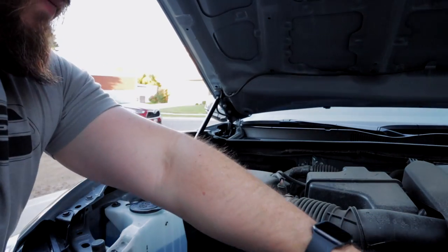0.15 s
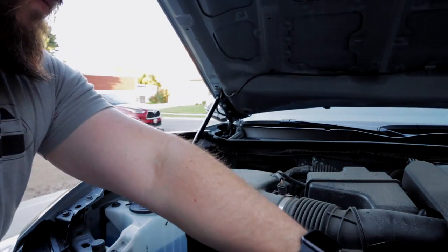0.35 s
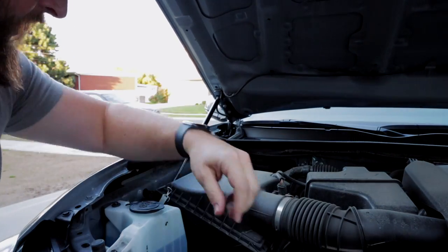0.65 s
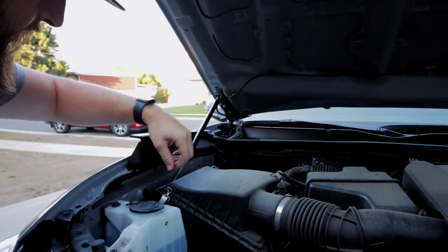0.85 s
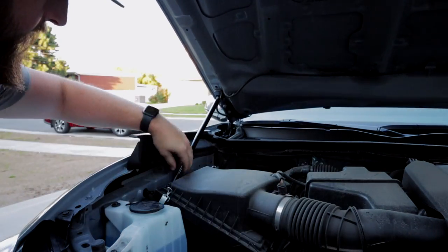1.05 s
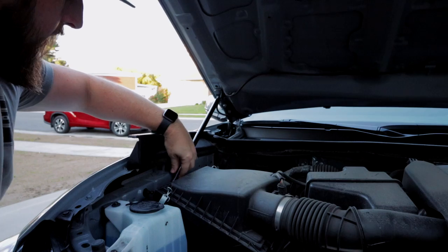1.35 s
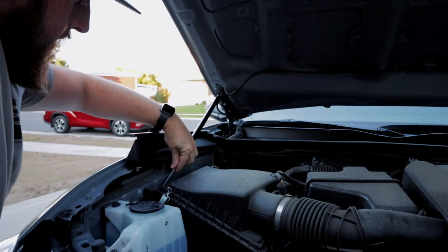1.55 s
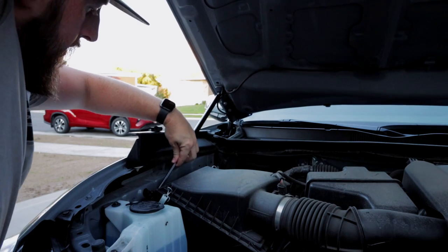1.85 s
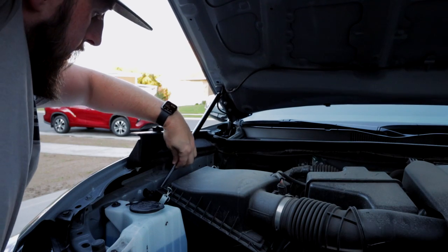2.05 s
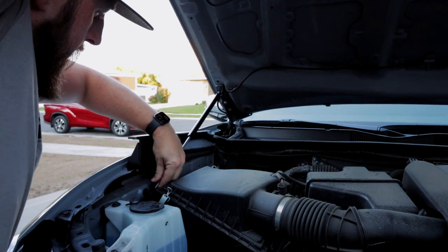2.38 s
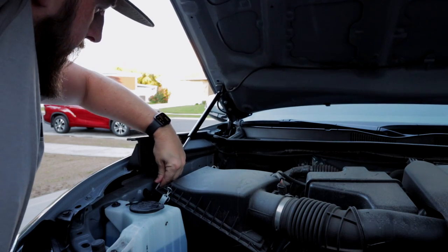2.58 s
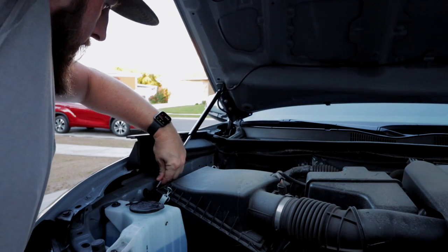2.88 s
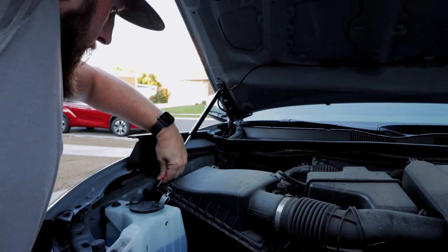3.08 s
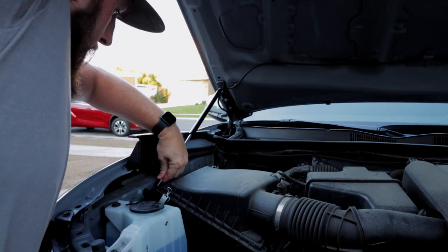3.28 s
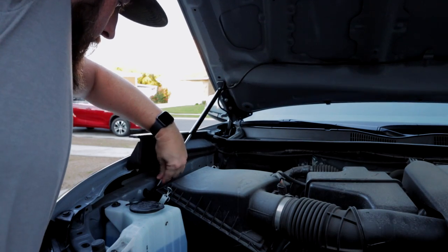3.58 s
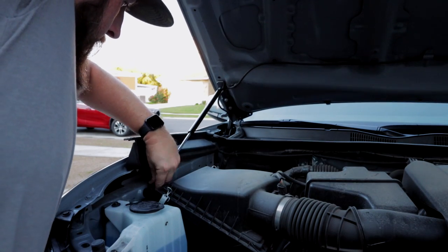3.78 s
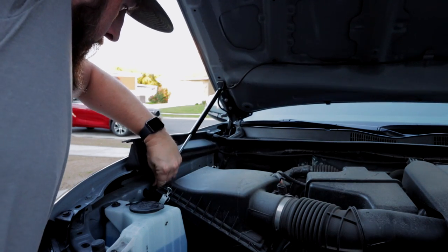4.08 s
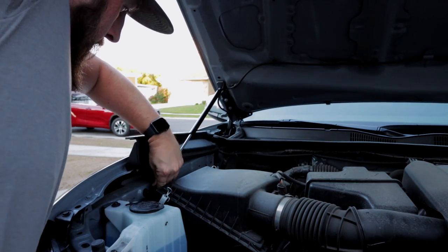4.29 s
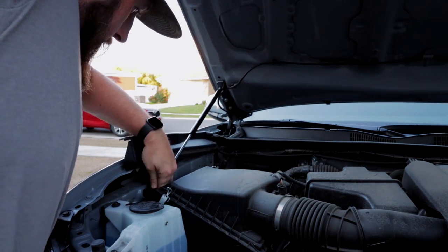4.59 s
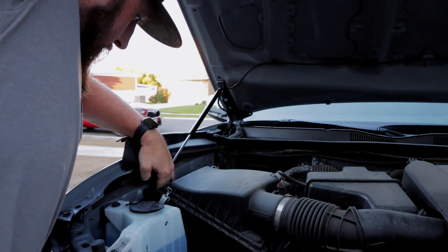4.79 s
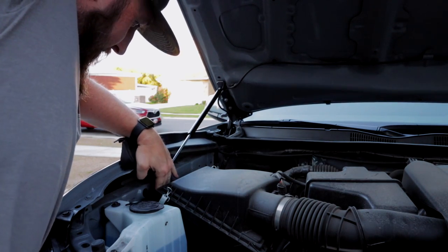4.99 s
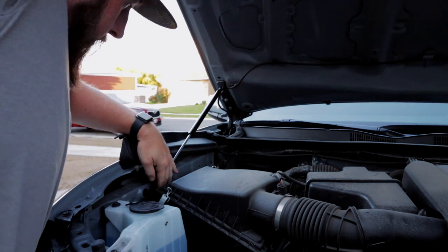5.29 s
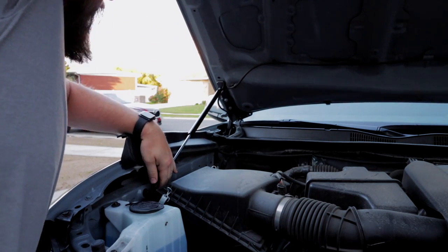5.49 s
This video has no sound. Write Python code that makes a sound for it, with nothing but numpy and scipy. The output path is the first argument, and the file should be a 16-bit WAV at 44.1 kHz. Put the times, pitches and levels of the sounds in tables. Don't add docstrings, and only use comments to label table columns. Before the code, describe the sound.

Irregular metallic knocks, plastic-on-steel raps and short rubbing strokes, heard close in an engine bay with a short boxy echo and faint hood booms. Far road hum stays low beneath. After a run of quieter scraping, the socket seats with a hard, ringing snap that clips the microphone, followed by light hand friction and tiny ticks.

```python
import sys
import numpy as np
from scipy import signal
from scipy.fft import rfft, irfft, next_fast_len
from scipy.io import wavfile
from scipy.ndimage import uniform_filter1d, map_coordinates

SR = 44100
rng = np.random.default_rng(int(sys.argv[2]) if len(sys.argv) > 2 else 0)


def log_audio(samples):
    frames = np.atleast_2d(samples).T
    limited = np.clip(frames, -1, 1)
    pcm = np.round(limited * 32767).astype(np.int16)
    wavfile.write(sys.argv[1], SR, pcm)


def decibels_to_gain(level_db):
    exponent = np.asarray(level_db, float) / 20
    return 10 ** exponent


N = 248724

# (time [s], bracket level [dB], panel level [dB re bracket], hardness [dB], panel tilt [dB/octave])
KNOCKS = [(0.025, -35, 1, -8, 8.5), (0.308, -20, 5, -9.5, 3.5), (0.322, -25, -3, -0.5, 5),
          (1.146, -39, 4.5, -5, -4), (1.158, -36, -13, -2.5, 8), (1.424, -14.5, 7.5, -13, 10),
          (1.453, -15.5, 5, -23, 7), (1.475, -22, 10, -16, 5), (1.536, -43, 15, -5.5, 10),
          (2.253, -32, 13, -28, -1.5), (2.317, -37.5, 12, -9.5, 1.5), (2.342, -45, 21, -34, -5),
          (2.385, -52, 1, -2, 21), (2.565, -17, -5, -10.5, -3), (3.357, -31, 2, -18, -23.5),
          (3.48, -38.5, 10, -7.5, -2), (3.693, -47.5, 11.5, 4, 5), (4.799, -42.5, 4.5, -6, -9),
          (4.85, -15, -8, -8.5, 15), (4.897, -7.5, -5.5, -3, 1), (4.902, -5, -5.5, -4.5, -6),
          (4.932, -19, 3.5, -7, 1), (5.048, -45.5, -3, 2, 11)]
# (time [s], bracket level [dB], panel level [dB re bracket], hardness [dB], stroke length [s])
SCRAPES = [(0.153, -44, 4.5, -18, 0.024), (0.183, -37, 1.5, -9.5, 0.055), (0.344, -35, -15, -4, 0.013),
           (0.452, -42, -22, -7, 0.03), (2.175, -36.5, 5, -13.5, 0.015), (2.206, -38.5, 5, -27, 0.017),
           (2.262, -40.5, 23, -27, 0.014), (3.356, -41.5, 12, -18, 0.011), (3.463, -35.5, 13, -9.5, 0.032),
           (3.534, -63, 15, -14, 0.035), (3.742, -59, 25, -14, 0.055), (3.811, -30, 4, -14, 0.069),
           (3.847, -24, -4, -35, 0.019), (3.906, -49.5, 16.5, -21, 0.0081), (4.018, -39, -20, -24, 0.014),
           (4.126, -55.5, 16.5, -22, 0.014), (4.467, -28.5, 0, -7, 0.025), (4.775, -52, 9, -5, 0.044),
           (4.834, -13, -6, -11, 0.028), (4.846, -26.5, -23, -6.5, 0.067), (5.161, -40, -22, -7, 0.0074)]
# (time [s], bracket level [dB], panel level [dB re bracket], rod level [dB re bracket], length [s])
RAPS = [(1.451, -28.5, -12, -5, 0.0064), (1.948, -20.5, -4, -15.5, .008), (1.955, -31.5, 4.5, -10, 0.021),
        (2.569, -13.5, -12.5, -9, 0.012), (3.36, -37, 0, -7, .01), (3.797, -29, -6, -11.5, 0.028),
        (3.982, -24.5, -9, -16, 0.03)]
# (time [s], rod level [dB], spring clip level [dB re rod])
TICKS = [(.312, -44.5, 16), (1.222, -45.5, 1), (1.433, -49, 6.5), (1.453, -32.5, -7.5), (1.797, -58, 7),
         (1.827, -66, -3), (2.254, -42, 2), (2.32, -53.5, 7), (4.021, -62, 12), (5.053, -58, -2),
         (2.568, -69, -14), (3.563, -61, 4), (4.478, -67, -4), (4.544, -56, 4.5), (4.847, -52, 8),
         (4.899, -28, 21.5), (5.33, -61, 11), (5.36, -59, 12), (5.449, -64, 17)]

# (frequency [Hz], level [dB], t60 [s])
PANEL_MODES = [(197.8, -7, 0.2), (252.9, -0.5, 0.27), (317.5, -11, .2), (333.7, 2, 0.16), (392, -5.5, 0.15),
               (484.5, -8.5, 0.16), (578.4, -3, 0.13), (597.6, -12, 0.22)]
# (frequency [Hz], level [dB], t60 [s])
BRACKET_MODES = [(716.7, 7.5, 0.042), (839, -0.5, 0.11), (892.4, 8, 0.085), (1016.4, 9, 0.042),
                 (1085, 6.5, 0.056), (1242, -2, 0.083), (1335, -12.5, 0.042), (1370, 3, 0.083),
                 (1573, -5.5, 0.087), (1712, -0.5, 0.016), (1830, -37, 0.11)]
# (frequency [Hz], level [dB], t60 [s])
ROD_MODES = [(2370, -2, .11), (2495, -2, .12), (2770, -6, .07), (3280, -6, .08), (3440, -5, .07),
             (3800, -10, .08)]
# (frequency [Hz], level [dB], t60 [s])
CLIP_MODES = [(4680, -5, .05), (5150, -6, .04), (5500, -7, .04), (5980, 0, .045), (6150, -7, .035),
              (13900, -4, .014), (14300, -3, .014), (15200, -4, .014)]
# (low edge [Hz], high edge [Hz], level [dB], t60 [s])
DENSE_MODES = [
    (233, 806, -4, 0.19),
    (626, 1940, 6, 0.087),
    (1820, 3960, 8, 0.071),
    (3860, 12200, -2.5, 0.064),
]
# (frequency [Hz], level [dB], t60 [s])
SEAT_MODES = [(237.4, -2.5, 0.28), (315, 0.5, 0.2), (400.4, -16.5, 0.45), (848, -5, 0.053), (1100, -7, .07),
              (1231, 9.5, 0.084), (1322, 6.5, 0.096), (1370, -9, 0.071), (1600, -10, 0.042),
              (2368, 6, 0.053), (2460, -11, 0.08), (5980, -23, 0.02), (14600, -9, .025)]

# (frequency [Hz], t60 [s])
BAY_DECAY = [(200, 0.59), (1000, 0.31), (3000, 0.27), (6000, 0.15), (15000, 0.11)]
# (time [s], level [dB])
HOOD_BOOMS = [(0.339, -45.5), (1.168, -52), (1.468, -36.5), (1.968, -61), (2.278, -43), (2.577, -49),
              (3.373, -49), (4.909, -52)]
# (time [s], hold [s], skin level [dB], sleeve level [dB re skin])
SLIDES = [(0.278, 0.089, -66, 2), (1.094, .06, -60, -9), (1.159, 0.021, -56, 6), (1.37, .03, -57, -4),
          (1.52, 0.21, -69.5, 9), (1.8, 0.054, -57.5, -7), (1.91, 0.21, -65, -3), (2.195, 0.032, -56, -10),
          (2.235, 0.025, -59, 5), (3.797, 0.033, -55.5, -1), (4.55, 0.013, -56, -5), (4.782, .04, -65.5, 6),
          (4.947, 0.056, -56.5, 7), (5.053, 0.14, -51.5, 0.5), (5.255, 0.15, -50, -4.5),
          (5.454, 0.15, -48, -9)]
# (frequency [Hz], level [dB])
SKIN_SPECTRUM = [(3500, -23), (5500, -6.5), (7000, -0.5), (8200, 1.5), (9400, -2), (10600, -9),
                 (12300, 7.5), (14300, 1.5), (15800, -13.5)]
# (frequency [Hz], level [dB])
SLEEVE_SPECTRUM = [(1500, 8.5), (2500, -4.5), (4000, 4), (6000, 1), (8000, -43)]
# (time [s], frequency [Hz], level [dB])
SQUEAK_PATH = [(3.755, 5700, -69), (3.765, 5957, -62), (3.777, 5992, -60), (3.789, 5750, -62),
               (3.84, 5300, -74)]
# (time [s], rumble level [dB])
TRAFFIC_LEVEL = [(0, -53), (.96, -56), (1.65, -53), (2.1, -54.5), (3.03, -53.5), (3.31, -51), (4.2, -54.5),
                 (4.84, -49), (5.64, -51.5)]
# (frequency [Hz], level [dB])
RUMBLE_SPECTRUM = [(12, -53), (25, -9), (40, -9), (60, -3.5), (90, -0.5), (118, 2), (160, -2.5), (250, -24),
                   (400, -72)]
# (frequency [Hz], level [dB])
ROAD_SPECTRUM = [(80, -33), (150, -11.5), (250, -2.5), (400, -6.5), (650, -4.5), (960, -4.5), (1400, -13),
                 (2200, -21), (4000, -26.5), (8400, -32), (10500, -30), (13000, -21), (16000, -33)]
# (frequency [Hz], gain [dB])
MIC_RESPONSE = [(5000, -0.5), (8500, 1), (10500, -2.5), (12000, -9), (14500, -10), (15650, 2), (15900, -59)]

KNOCK_S, TICK_S = 0.006, 0.0042
CLIP_PER_HARD, CLIP_DB = 1.48, -7.5
TICK_BRACKET_DB, TICK_PANEL_DB = -6, -12
TICK_DAMP = 0.72
PUSH_TILT_DB = 0
RAP_CLIP_DB, RAP_TILT_DB = -47, 1
SEAT_S, SEAT_DB, SEAT_RISE_S = 4.901, -12, 0.0054
SLIDE_RISE_S, SLIDE_FALL_S = 0.044, 0.034
GRIP_DB = -73
ROAD_DB, ROAD_FOLLOWS = -52.5, 0.08


def ring(modes, crowd, chatter, tilt_db, damp):
    t = np.arange(SR // 4) / SR
    hz, db, t60 = np.transpose(modes)[:, :, None]
    low_hz, high_hz, crowd_db, crowd_t60 = crowd
    t60, crowd_t60 = damp * t60, damp * crowd_t60
    grow = 1 - np.exp(-(t * low_hz) ** 2)

    strength_db = db + 3.9 * rng.standard_normal(hz.shape) + tilt_db * np.log2(hz / low_hz)
    level = decibels_to_gain(strength_db - 60 * t / t60)
    knots = rng.standard_normal((len(hz), 40))
    drift = np.array([np.interp(t * 110, np.arange(len(k)), k) for k in knots])
    stored = signal.fftconvolve(chatter[None] ** 2, (grow * level) ** 2, axes=1)[:, :len(t)]
    phase = 2 * np.pi * hz * t + 1.45 * np.sqrt(hz / 900) * drift
    lines = np.sum(np.sqrt(np.abs(stored)) * np.sin(phase), axis=0)

    f = np.fft.rfftfreq(len(t), 1 / SR) + 1
    band = decibels_to_gain(tilt_db * np.log2(f / low_hz)) / (1 + (low_hz / f) ** 6) / (1 + (f / high_hz) ** 6)
    noise = rfft(rng.standard_normal(len(t)))
    dense = irfft(noise * band, len(t)) / np.sqrt(np.mean(band ** 2))
    tail = decibels_to_gain(crowd_db - 60 * t / crowd_t60) + decibels_to_gain(crowd_db - 21 - 24 * t / crowd_t60)
    energy = signal.fftconvolve(chatter ** 2, (grow * tail) ** 2)[:len(t)]
    return lines + dense * np.sqrt(np.abs(energy))


def contacts(rows, rise, spike_db, gain_db, damp=1):
    out = np.zeros(N + SR)
    parts = PANEL_MODES, BRACKET_MODES, ROD_MODES, CLIP_MODES
    for s, db, panel_db, rod_db, clip_db, panel_tilt_db, bracket_tilt_db, length in rows:
        u = np.arange(SR // 8) / SR / max(length, 1e-3)
        taps = decibels_to_gain(9.7 * np.repeat(rng.standard_normal(len(u) // 60 + 1), 60)[:len(u)])
        chatter = (1 - np.exp(-u / rise)) * np.exp(-u ** 2) * taps
        chatter[round(rise * length * SR)] += decibels_to_gain(spike_db)

        rod_tilt_db = min(0.64 * rod_db + 3.5, 3)
        clip_tilt_db = np.clip(0.5 * (clip_db - rod_db) - 7.0, -13, 3)
        tilts = panel_tilt_db, bracket_tilt_db, rod_tilt_db, clip_tilt_db
        levels = panel_db, 0, rod_db, clip_db
        start = round((s + 0.0015) * SR)
        for modes, crowd, tilt_db, rel_db in zip(parts, DENSE_MODES, tilts, levels):
            sound = ring(modes, crowd, chatter, tilt_db, damp)
            peak = np.sqrt(uniform_filter1d(sound ** 2, size=300).max())
            out[start:][:len(sound)] += decibels_to_gain(db + rel_db + gain_db) * sound / peak
    return out[:N]


def gripped(s, db, panel_db, hard_db, tilt_db, length):
    return s, db, panel_db, hard_db, CLIP_DB + CLIP_PER_HARD * hard_db, tilt_db, 0, length


def knocks():
    rows = [gripped(*row, KNOCK_S) for row in KNOCKS]
    return contacts(rows, rise=0.039, spike_db=19, gain_db=-6.0)


def ticks():
    rows = []
    for s, rod_db, clip_db in TICKS:
        bracket_db = rod_db + TICK_BRACKET_DB
        rows.append((s, bracket_db, TICK_PANEL_DB, -TICK_BRACKET_DB, clip_db - TICK_BRACKET_DB, 0, 0, TICK_S))
    return contacts(rows, rise=0.12, spike_db=20, gain_db=-7.0, damp=TICK_DAMP)


def scrapes():
    rows = [gripped(*row, PUSH_TILT_DB, length) for *row, length in SCRAPES]
    return contacts(rows, rise=0.36, spike_db=-14, gain_db=-8.0)


def raps():
    rows = [(*row, RAP_CLIP_DB, PUSH_TILT_DB, RAP_TILT_DB, length) for *row, length in RAPS]
    return contacts(rows, rise=0.079, spike_db=13, gain_db=-8)


def seat():
    t = np.arange(SR // 4) / SR
    hz, db, t60 = np.transpose(SEAT_MODES)[:, :, None]
    phase = 2 * np.pi * (hz * t + rng.random(hz.shape))
    tones = decibels_to_gain(SEAT_DB + db - 60 * t / t60) * np.sin(phase)
    out = np.zeros(N)
    out[round(SEAT_S * SR):][:len(t)] = (1 - np.exp(-(t / SEAT_RISE_S) ** 2)) * tones.sum(axis=0)
    return out


def bay(x):
    hz, t, z = signal.stft(rng.standard_normal(SR // 2), SR, nperseg=256)
    decay = decibels_to_gain(-60 * t / along(BAY_DECAY, hz)[:, None])
    tail = signal.istft(z * decay, SR, nperseg=256)[1]
    return signal.fftconvolve(x, tail / np.linalg.norm(tail))[:N]


def hood():
    out = np.zeros(N + SR)
    t = np.arange(SR // 2) / SR
    boom = np.sin(2 * np.pi * 112 * t) + 0.52 * np.sin(2 * np.pi * 124 * t)
    swell = 1 - np.exp(-t / 0.013)
    for s, db in HOOD_BOOMS:
        out[round(s * SR):][:len(t)] += decibels_to_gain(db - 60 * t / 0.61) * swell * boom
    return out[:N]


def rustle():
    t = np.arange(N) / SR
    s, hold, skin_db, sleeve_db = np.transpose(SLIDES)[:, :, None]
    swell = np.clip((t - s) / SLIDE_RISE_S + 1, 0, 1) ** 2
    shape = swell * np.exp(-np.maximum(t - s - hold, 0) / SLIDE_FALL_S)
    slips = decibels_to_gain(1.5 * wobble(40) + 2.4 * wobble(160) - 4.0)
    skin_level = decibels_to_gain(GRIP_DB) + np.sum(decibels_to_gain(skin_db) * shape, axis=0)
    sleeve_level = decibels_to_gain(GRIP_DB) + np.sum(decibels_to_gain(skin_db + sleeve_db) * shape, axis=0)
    skin = skin_level * rush(SKIN_SPECTRUM, patchy_db=2.0)
    sleeve = sleeve_level * rush(SLEEVE_SPECTRUM, patchy_db=-1.5)
    return slips * (skin + sleeve)


def squeak():
    hz, db = curves(SQUEAK_PATH)
    t = np.arange(N) / SR
    start, end = SQUEAK_PATH[0][0], SQUEAK_PATH[-1][0]
    gate = np.clip(np.minimum(t - start, end - t) / 0.0083, 0, 1)
    level = decibels_to_gain(db + 2 + 3.5 * wobble(150))
    phase = 2 * np.pi * np.cumsum(hz * (1 + 0.0065 * wobble(200))) / SR
    return gate * level * np.sin(phase)


def traffic():
    near_db, = curves(TRAFFIC_LEVEL)
    rumble = decibels_to_gain(near_db - 3.3 + 0.4 * wobble(6)) * rush(RUMBLE_SPECTRUM, patchy_db=0.4)
    sway_db = 0.6 * wobble(8)
    hiss_db = ROAD_DB + ROAD_FOLLOWS * (near_db - near_db.mean()) + sway_db
    return rumble + decibels_to_gain(hiss_db) * rush(ROAD_SPECTRUM, patchy_db=1.6)


def rush(spectrum, patchy_db):
    z = signal.stft(rng.standard_normal(N + 512), nperseg=256)[2]
    field = uniform_filter1d(rng.standard_normal(z.shape), size=6, axis=0)
    field = uniform_filter1d(field, size=8, axis=1)
    white = signal.istft(z * decibels_to_gain(patchy_db * unit(field)), nperseg=256)[1][:N]
    return unit(coloured(white, spectrum))


def coloured(x, spectrum):
    size = next_fast_len(N + 4096)
    gain = decibels_to_gain(along(spectrum, np.fft.rfftfreq(size, 1 / SR)))
    return irfft(rfft(x, size) * gain, size)[..., :N]


def along(points, hz):
    f, v = np.transpose(points)
    return np.interp(np.log(hz + 1), np.log(f + 1), v)


def curves(rows):
    s, *cols = np.transpose(rows)
    return [np.interp(np.arange(N) / SR, s, c) for c in cols]


def wobble(rate):
    knots = rng.standard_normal(int(N * rate / SR) + 4)
    return map_coordinates(knots, [np.arange(N) * rate / SR])


def unit(x):
    return x / np.sqrt(np.mean(x ** 2) + 1e-20)


def scene():
    work = knocks() + ticks() + seat() + scrapes() + raps()
    work = signal.sosfilt(signal.butter(4, 175, "high", fs=SR, output="sos"), work)
    echo = decibels_to_gain(-16) * bay(work)
    return (work + echo + hood() + rustle() + squeak() + traffic())[None]


def top_cut(x):
    return signal.sosfilt(signal.butter(12, 16490, fs=SR, output="sos"), x)


def record(dry):
    heard = coloured(dry, MIC_RESPONSE)
    clipped = heard / (1 + np.abs(heard) ** 12) ** (1 / 12)
    return top_cut(clipped)


dry = scene()
out = record(dry)
log_audio(out)
```